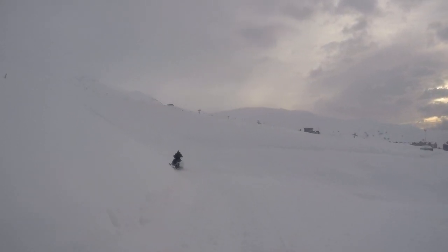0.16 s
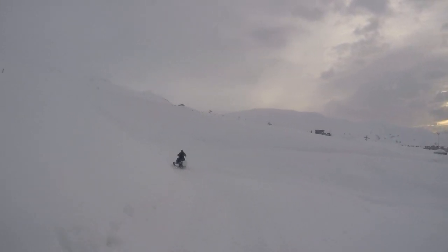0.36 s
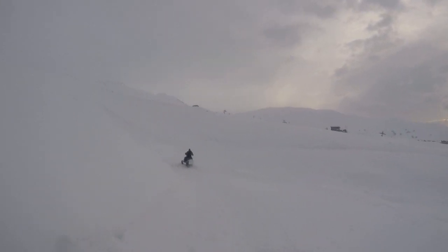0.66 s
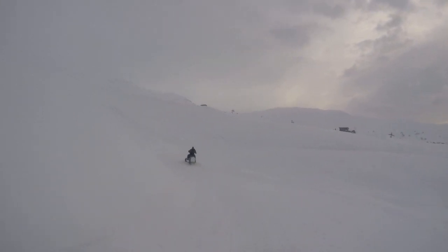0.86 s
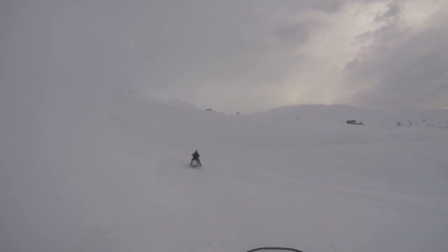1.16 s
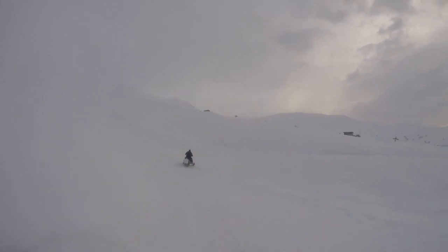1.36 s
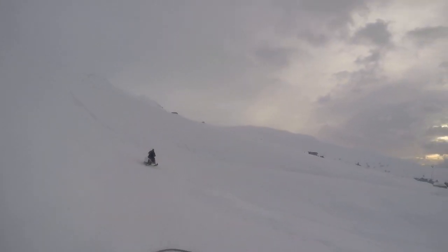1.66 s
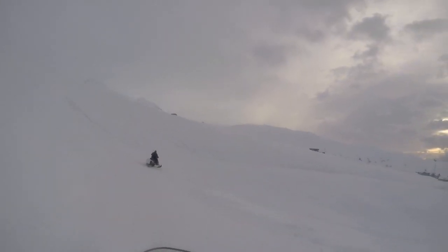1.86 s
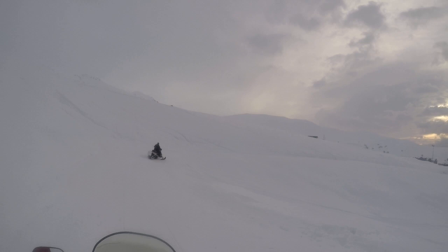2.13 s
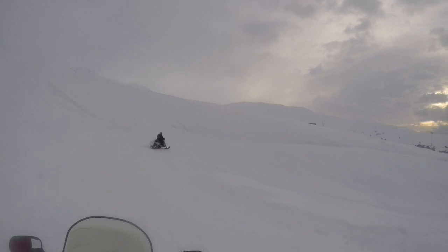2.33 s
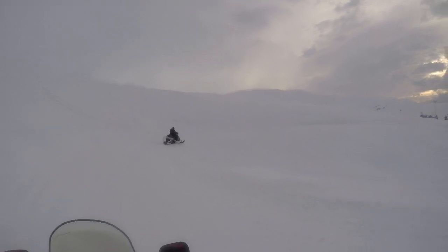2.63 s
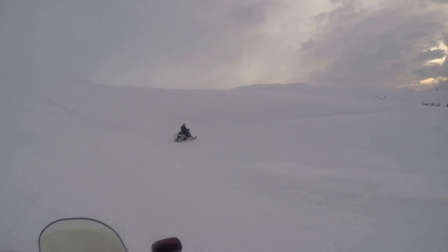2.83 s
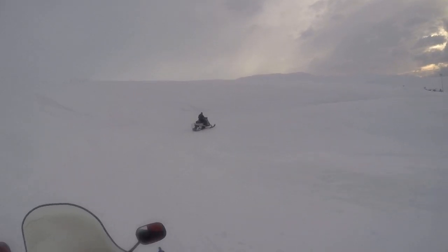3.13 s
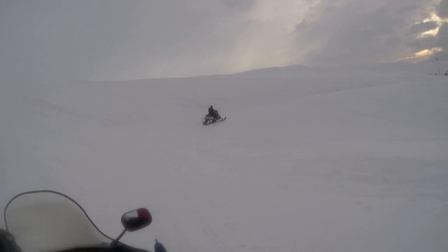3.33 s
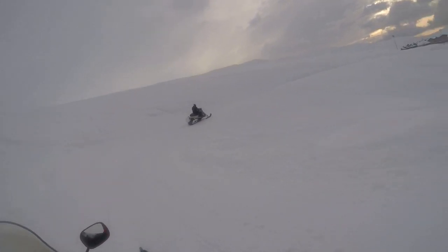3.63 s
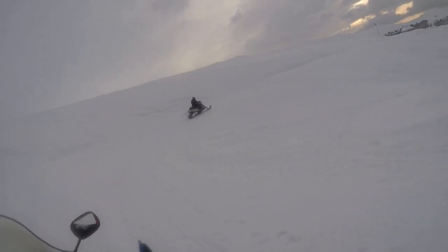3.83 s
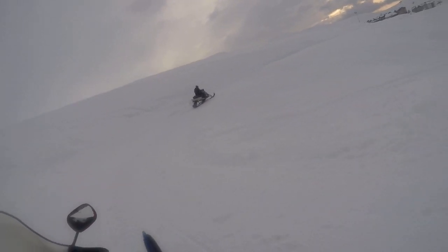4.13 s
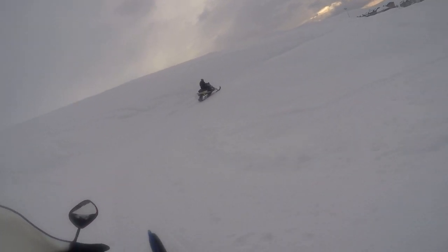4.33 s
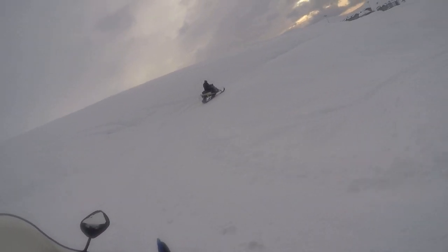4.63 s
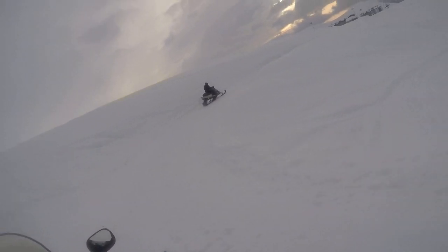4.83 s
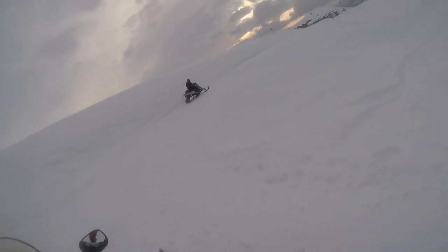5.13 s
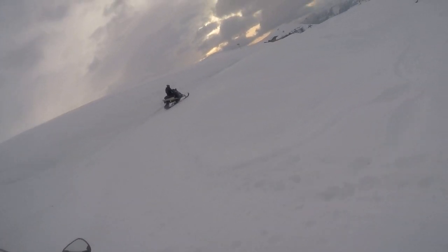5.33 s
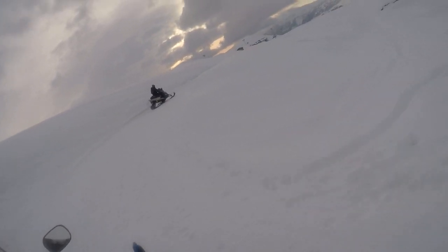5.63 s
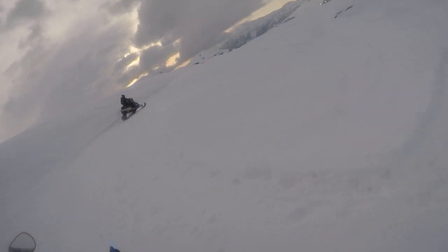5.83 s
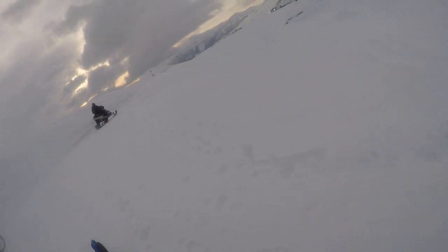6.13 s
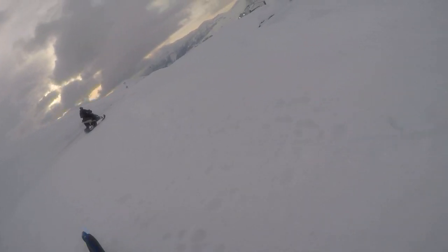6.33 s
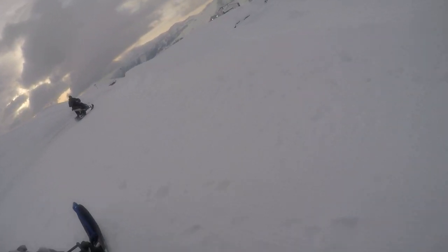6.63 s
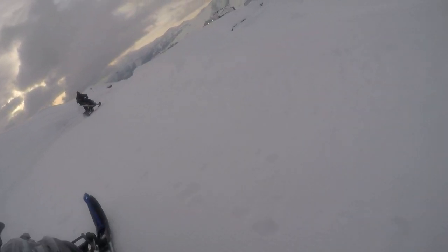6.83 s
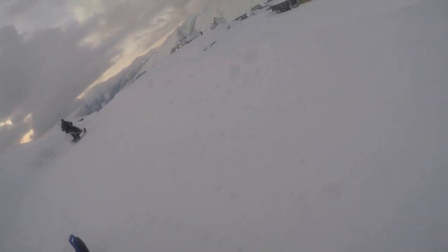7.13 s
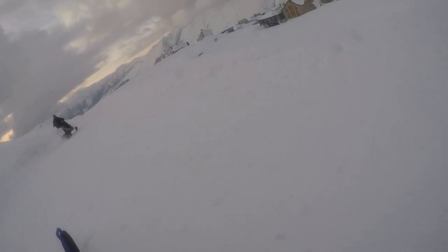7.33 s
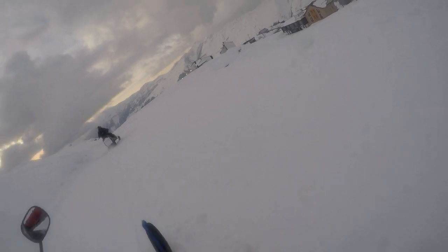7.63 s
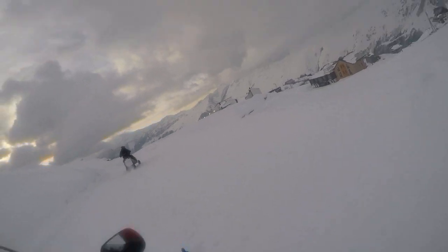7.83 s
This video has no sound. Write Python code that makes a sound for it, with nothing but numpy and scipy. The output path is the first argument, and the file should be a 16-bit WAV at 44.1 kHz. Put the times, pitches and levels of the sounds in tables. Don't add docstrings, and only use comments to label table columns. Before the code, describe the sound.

Outdoors on open snow, a close three-cylinder engine purrs and rattles while tiny grains tick the microphone housing. Revs swell and sink, then hold through a climb as low wind rumble grows. A long surge and a shorter one turn into harsh, singing roars, partly overloaded by gusts. Finally the revs drop into a coasting hum with one dull, heavy knock.

```python
import sys
import numpy as np
from scipy import signal
from scipy.fft import rfft, irfft, next_fast_len
from scipy.io import wavfile
from scipy.ndimage import uniform_filter1d

SR = 44100
rng = np.random.default_rng(int(sys.argv[2]) if len(sys.argv) > 2 else 0)


def linear_from_db(decibels):
    return 10 ** (np.asarray(decibels, float) / 20)


def dump_mix(stems):
    frames = np.atleast_2d(stems).T
    limited = np.clip(frames, -1, 1)
    pcm = np.round(limited * 32767).astype(np.int16)
    wavfile.write(sys.argv[1], SR, pcm)


N = 351914

# (frequency [Hz], width [Hz], level [dB])
INTAKE = [(880, 120, -3), (990, 120, 0), (1100, 120, -1), (1200, 110, -3)]


def evened(x):
    return x / np.sqrt(np.mean(x ** 2) + 1e-20)


def read(points, hz):
    f, value = np.transpose(points)
    return np.interp(np.log(hz + 1), np.log(f + 1), value)


def curves(rows):
    s, *columns = np.transpose(rows)
    return [np.interp(np.arange(N) / SR, s, c) for c in columns]


def white():
    return rng.standard_normal(N)


def noise(spectrum):
    size = next_fast_len(N)
    hz = np.fft.rfftfreq(size, 1 / SR)
    shaped = rfft(rng.standard_normal(size)) * linear_from_db(read(spectrum, hz))
    return evened(irfft(shaped, size)[:N])


def wander(per_s):
    knots = rng.standard_normal(int(N / SR * 60) + 2)
    return np.interp(np.arange(N) / SR * per_s, np.arange(len(knots)), knots)


def between(start, end, edge):
    t = np.arange(N) / SR
    return np.clip(np.minimum(t - start, end - t) / edge + .5, 0, 1)


def ring(x, modes):
    size = next_fast_len(N + 4096)
    delay = np.exp(-2j * np.pi * np.fft.rfftfreq(size))
    response = 0
    for k, (hz, width, db) in enumerate(modes):
        pole = np.exp((2j * hz - width) * np.pi / SR)
        response = response + (-1) ** k * linear_from_db(db) * ((1 - abs(pole)) / (1 - pole * delay)) ** 2
    return evened(irfft(rfft(x, size) * response, size)[:N])


def strokes(turns, pattern_db, depth, spread_db):
    firing = np.floor(len(pattern_db) * turns).astype(int)
    chance_db = spread_db * rng.standard_normal(firing[-1] + 1)[firing]
    size_db = depth * np.take(pattern_db, firing % len(pattern_db)) + chance_db
    return evened(linear_from_db(size_db) * (np.diff(firing, prepend=firing[0]) > 0))


def gate(turns, lag, length, depth):
    decay = np.exp(-((turns - lag) % 1) / length)
    return evened(1 + depth * uniform_filter1d(decay, size=90))


def loads(hz, throttle, lug):
    idle = np.clip((38 - hz) / (38 - 35), 0, 1) * (np.arange(N) < 2 * SR)
    pull = throttle ** 2
    part = 1 - pull
    return np.array([idle * part, (1 - idle) * (1 - lug) * part, lug * part, pull])


def order(k, turns):
    return np.sqrt(2) * np.cos(2 * np.pi * (k * turns + rng.random()))


def exhaust_orders(turns, hz, load):
    idle = [-17, -12, -8, -17, -12, -6, -13, -8, -14, -21, -11, -12, -17, -24, -25, -24, -23]
    cruise = [-12, -12, -9, -13, -18, -3, -12, -14, -3, -16, -16, -13, -12, -15, -9, -16, -18]
    lugging = [-15, -16, -12, -14, -20, -7, -20, -14, -7, -19, -16, -13, -8, -15, -12, -18, -18]
    pulling = [-9, -7, -5, -12, -15, -9, -13, -7, -12, -17, -13, -14, -13, -15, -14, -17, -16]
    # (frequency [Hz], level [dB])
    pipe = [(150, -2), (205, 0), (255, -6), (315, 1), (350, -1), (382, 1), (425, 0), (460, -5), (495, 2),
            (530, -8), (580, 1), (640, -7), (720, -11), (820, -8), (1000, -16)]
    hot_pipe = [(440, 0), (500, -7), (545, 0), (580, 5), (640, 0)]
    tone = np.zeros(N)
    for k, by_load_db in enumerate(np.transpose([idle, cruise, lugging, pulling]), 4):
        pipe_db = read(pipe, k * hz) + load[3] * read(hot_pipe, k * hz)
        level_db = by_load_db @ load + pipe_db + 1.5 * wander(3)
        tone += linear_from_db(level_db - 1.5) * order(k, turns)
    return tone


def exhaust_turbulence():
    # (frequency [Hz], level [dB per Hz])
    puff = [(100, -48), (145, 9), (189, 5.5), (241, -2), (306, -1), (450, -2.5), (625, -8), (800, -12.5),
            (1040, -31), (1760, -120)]
    return linear_from_db(2.5) * noise(puff)


def intake_pulses(turns, throttle):
    cylinders_db = [0, -5, -13]
    return linear_from_db(-10) * ring(strokes(turns, cylinders_db, 1 + .2 * throttle, .8), INTAKE)


def intake_roar(throttle):
    return (1 - .6 * throttle) * ring(white(), INTAKE)


def panel_knocks(turns):
    # (frequency [Hz], width [Hz], level [dB])
    panel = [(1690, 130, 0), (1785, 130, -1), (1895, 120, -7)]
    return ring(strokes(turns - .03, [0, -21, -23], 1, .6), panel)


def cowling_buzz():
    # (frequency [Hz], width [Hz], level [dB])
    cowling = [(1750, 290, 0), (2080, 220, -10), (1540, 200, -13)]
    return ring(white(), cowling)


def valve_cover(load):
    # (frequency [Hz], width [Hz])
    gear = [(2900, 330), (3840, 110), (4350, 750), (4450, 160), (5900, 350), (6480, 320), (6950, 500),
            (7750, 320), (8850, 280), (9500, 420), (10500, 300)]
    gear_loads = [
        [3, -12, -7.5, -13, -11, -15, -10, -6, -5, -8, -24],
        [-1, -11, -16, -13, -17, -8, -9, -3, -7.5, -10.5, -40],
        [-0.083, -10, -20, -2.5, -12, -6, -7, -3.5, -4.5, -10, -25],
        [-2, -3, -25, -1, -9, -9, -7, -3, -8.5, -5, -25],
    ]
    hz, t, z = signal.stft(white(), SR, nperseg=512)
    share = load[:, np.minimum(np.round(t * SR).astype(int), N - 1)]
    shape = np.array([1 / (1 + (2 * (hz - f) / width) ** 2) for f, width in gear])
    response = shape.T @ linear_from_db(np.transpose(gear_loads) @ share)
    return evened(signal.istft(z * response, SR, nperseg=512)[1][:N])


def injector_ticks(turns, hz, throttle):
    puff = white() * gate(turns, .267, .1, 40)
    tick = linear_from_db(-1.5 + 1.6 * wander(2.4)) * ring(puff, [(9690, 540, 0)])
    tick += linear_from_db(-4 + 2 * wander(4.1)) * ring(puff, [(8900, 600, 0)])
    return linear_from_db(-2.5 - 20 * np.sqrt(throttle) - 1.26 * (hz - 32)) * tick


def shroud_rattle(turns, hz, throttle):
    # (frequency [Hz], width [Hz], level [dB])
    shroud = [(3840, 120, 0), (4480, 260, 0), (5700, 500, -3), (6800, 900, -1), (7750, 400, 1)]
    level = linear_from_db(-6 + .5 * (hz - 47.5)) * throttle ** 2
    return level * gate(turns, .75, .33, 6) * ring(white(), shroud)


def valve_gear(turns, hz, throttle, load):
    # (frequency [Hz], level [dB per Hz])
    hiss = [(1350, -31), (2250, 2), (2600, 0), (2930, 0), (3520, -4.5), (4080, -4.5), (4600, -4),
            (5340, -7.5), (6760, -11), (7730, -16.5), (8320, -10), (9720, -11), (11500, -36.5),
            (15000, -66), (22000, -120)]
    throb = 1 + (.25 + .5 * throttle) * (gate(turns, .02, .3, 2.5) - 1)
    rush = noise(hiss) + linear_from_db(-3) * valve_cover(load)
    return throb * rush + shroud_rattle(turns, hz, throttle) + injector_ticks(turns, hz, throttle)


def track_rumble():
    # (frequency [Hz], level [dB per Hz])
    valley = [(500, -20), (700, 1.5), (1000, 7), (1400, 2), (2000, 3.5), (2600, -17), (3200, -36)]
    return np.array([noise(valley), noise(valley)])


def hood_and_airbox(turns, hz, load, opening, near_db):
    hood_idle = [-90, -90, -90, -90, -65, -70, -70, -62, -63, -67, -68, -65, -60, -64]
    hood_cruise = [-73, -67, -76, -78, -73, -69, -66, -58, -67, -63, -57, -64, -71, -73]
    hood_lugging = [-90, -90, -90, -90, -66, -61, -63, -68, -60, -66, -62, -67, -69, -70]
    # (frequency [Hz], level [dB])
    airbox = [(700, -34), (800, -26), (880, -17), (925, -4), (960, 0), (992, 0), (1020, -10), (1050, -17),
              (1110, -19), (1165, -9), (1220, -8), (1265, -14), (1330, -20), (1500, -21)]
    tone = np.zeros(N)
    part = load[:3] / (load[:3].sum(0) + 1e-9)
    boxed = np.clip((opening - .75) / .2, 0, 1)
    for k, by_load_db in enumerate(np.transpose([hood_idle, hood_cruise, hood_lugging]), 17):
        hood = (1 - boxed) * linear_from_db(by_load_db @ part + 20 * opening)
        box = boxed * linear_from_db(-37.5 + near_db + read(airbox, k * hz))
        tone += (hood + box) * linear_from_db(1.5 * wander(4)) * order(k, turns)
    return tone


def frame_hum(turns, lug):
    firing = linear_from_db(-30) * lug * np.cos(6 * np.pi * turns)
    drive = linear_from_db(-46) * (between(7.35, 9, .2) + .4 * lug) * np.cos(2 * np.pi * 21 * turns)
    return firing + drive


def engine():
    # (time [s], cycle rate [Hz])
    speed = [(.33, 31.8), (.84, 34.5), (1.16, 35.3), (1.53, 40), (1.76, 41.6), (2.22, 42.1), (2.36, 41.7),
             (2.69, 37.9), (3, 36.9), (3.15, 37.2), (3.4, 39), (3.65, 39.4), (4.04, 39.65), (4.51, 39.5),
             (4.76, 38.7), (5.38, 38.75), (5.82, 46.5), (6.25, 52.7), (6.31, 51.6), (6.6, 42.6),
             (6.68, 41.6), (6.8, 41.8), (7.16, 46.2), (7.38, 41.8), (7.69, 39.7), (7.98, 39.4)]
    # (time [s], throttle opening [0-1])
    rider = [(0, .14), (.7, .2), (1.2, .3), (1.4, .72), (1.85, .66), (2.4, .2), (3.15, .18), (3.32, .42),
             (5.36, .4), (5.48, 1), (6.3, 1), (6.36, .03), (6.62, .03), (6.7, .86), (6.87, .98), (7.16, 1),
             (7.22, .03), (7.98, 0)]
    # (time [s], gain [dB])
    lean = [(0, -2.5), (1.2, -0.5), (2, 1), (3.2, 1), (3.9, 5), (4.6, 5), (4.8, 2.5), (5.35, 3.5),
            (5.7, 6.5), (6.2, 11), (6.4, 8), (6.6, 8), (6.8, 7), (7.15, 7.5), (7.5, 8.5), (7.98, 5)]
    hz = uniform_filter1d(curves(speed)[0], size=2000)
    turns = np.cumsum(hz) / SR
    opening, lean_db = curves(rider)[0], curves(lean)[0]
    lug = between(3.35, 5.65, .2)
    throttle = opening ** 2
    fuel = np.minimum(opening / .22, 1)
    load = loads(hz, throttle, lug)

    step = 1 / (.2 * SR)
    sag_db = -9 * np.maximum(opening - signal.lfilter([step], [1, step - 1], opening), 0)

    exhaust_db = -38.5 - 3 * between(2.35, 3.2, .2) + 7.5 * fuel
    exhaust_db += (.042 * lean_db + .5 * opening) * (1 - throttle)
    intake_db = -49.5 + 22 * opening + sag_db
    mouth = linear_from_db(intake_db - 2 - 2 * lug - 6 * throttle ** 2)
    cowling_db = -44 + .5 * sag_db + 7.5 * np.sqrt(opening) + .81 * lean_db + between(3.75, 4.7, .45)
    hiss_db = -49 + 2.5 * opening + lean_db

    even = .33 + (.95 - .33) * np.minimum(2 * fuel, 1) - .025 * np.maximum(lean_db - 7, 0)
    tuned = (2 * lug + between(3.75, 4.7, .2)) / 3
    knock = .35 + .35 * opening + .54 * tuned * (1 - throttle)
    uneven, buzz = np.sqrt(1 - even ** 2), np.sqrt(1 - knock ** 2)

    steady = linear_from_db(exhaust_db) * even * exhaust_orders(turns, hz, load)
    steady += mouth * even * intake_pulses(turns, throttle)
    steady += linear_from_db(cowling_db) * knock * panel_knocks(turns)
    rough = []
    for _ in range(2):
        draw = linear_from_db(exhaust_db) * uneven * exhaust_turbulence()
        draw += mouth * uneven * intake_roar(throttle)
        draw += linear_from_db(cowling_db) * buzz * cowling_buzz()
        draw += linear_from_db(hiss_db) * valve_gear(turns, hz, throttle, load)
        rough.append(draw)
    frame = linear_from_db(hiss_db + 5 - 3 * throttle - 2.5 * (1 - fuel)) * track_rumble()
    frame += hood_and_airbox(turns, hz, load, opening, .31 * lean_db + sag_db)
    frame += frame_hum(turns, lug)
    return steady, np.array(rough), frame


def steadied(x, share):
    level = np.sqrt(abs(uniform_filter1d(x ** 2, size=3000)) + 1e-3)
    return evened(x / level ** share)


def gusty(lull_db, gusts):
    t = np.arange(0, N, 64) / SR
    power = linear_from_db(2 * lull_db[::64])
    for s, db, length in gusts:
        power = np.maximum(power, linear_from_db(2 * db - 48 * ((t - s) / length) ** 2))
    return np.sqrt(np.repeat(power, 64)[:N])


def wind():
    # (time [s], level [dB])
    strength = [(0, -43), (.6, -52), (1.3, -54), (1.64, -41), (1.7, -32.5), (2.5, -28.5), (3.5, -28),
                (4.1, -25.5), (4.9, -26), (5.2, -24.5), (5.6, -26), (5.8, -23), (6.3, -18.5), (7.15, -15.5),
                (7.27, -19.5), (7.4, -18), (7.98, -19)]
    # (frequency [Hz], level [dB per Hz])
    boom = [(8.8, -41), (15, -8), (43, 22), (54, 12), (70, 11), (80, -9), (100, -49), (180, -120)]
    drone = [(44, -17), (75, -13), (97, 8), (113, 10), (127, 0), (167, -24), (260, -24), (340, -32),
             (570, -120)]
    # (time [s], peak level [dB], length [s])
    boom_gusts = [(1.708, -30, 0.071), (1.83, -29, 0.06), (1.93, -25.5, 0.14), (2.01, -26.5, 0.13),
                  (2.71, -23, 0.086), (3.243, -23, 0.085), (3.333, -23, 0.09), (3.644, -23, 0.068),
                  (4.05, -17, 0.083), (4.199, -15.5, 0.054), (4.6, -31, 0.07), (4.693, -30, 0.06),
                  (4.765, -20, 0.064), (5.274, -19.5, 0.1), (5.752, -15, 0.16), (5.948, -9, 0.055),
                  (6.103, -7.5, 0.039), (6.173, -10, 0.025), (6.24, -9.5, 0.087), (6.796, -9, 0.047),
                  (6.92, -10, 0.055), (6.99, -10, 0.12), (7.127, -19, 0.11), (7.717, -9, 0.051)]
    drone_gusts = [(1.677, -36, 0.08), (2.012, -25, 0.045), (2.607, -24, 0.11), (2.695, -18.5, 0.086),
                   (2.977, -20, 0.076), (3.075, -22.5, 0.15), (3.405, -17, 0.078), (3.898, -21.5, 0.23),
                   (4.134, -21, 0.072), (4.19, -20, 0.055), (4.38, -16.5, 0.052), (4.652, -16.5, 0.084),
                   (4.955, -23, 0.083), (5.323, -24, 0.07), (5.382, -31, 0.07), (5.818, -20.5, 0.12),
                   (5.925, -18, 0.16), (6.026, -10.5, 0.054), (6.344, -13, 0.14), (6.541, -12.5, 0.15),
                   (7.006, -15, 0.09), (7.101, -14, 0.056), (7.348, -11, 0.048), (7.657, -13.5, 0.052)]
    wind_db = curves(strength)[0] + 2 * wander(8)
    drone_db = wind_db - 3 + 2 * wander(12)
    low = gusty(wind_db, boom_gusts) * steadied(noise(boom), .99)
    return low + gusty(drone_db, drone_gusts) * steadied(noise(drone), 1)


def knocks():
    # (time [s], peak level [dB], frequency [Hz])
    grains = [
        (.471, -40, 7500),
        (.513, -29, 8600),
        (.528, -39, 8000),
        (1.752, -37, 8500),
        (2.33, -36, 12000),
        (2.876, -30, 12400),
        (3.13, -38, 9000),
        (3.345, -35, 7975),
    ]
    # (time [s], peak level [dB], ring [Hz], t60 [s])
    bumps = [
        (1.679, -16, 250, .05),
        (1.682, -19, 330, .04),
        (1.686, -18, 150, .06),
        (7.838, -9, 165, .07),
        (7.852, -7, 490, .025),
        (7.842, -9, 250, .06),
        (7.848, -9, 360, .035),
        (7.853, -11, 620, .022),
        (7.854, -13, 780, .02),
        (7.853, -5, 72, .12),
    ]
    out, t = np.zeros(N + SR), np.arange(6000) / SR
    for s, db, hz in grains:
        out[round(s * SR):][:len(t)] += linear_from_db(db - 60 * t / .0013) * np.sin(2 * np.pi * hz * t)
    for s, db, hz, t60 in bumps:
        onset = 1 - np.exp(-t / .0026)
        out[round(s * SR):][:len(t)] += linear_from_db(db - 60 * t / t60) * onset * np.sin(2 * np.pi * hz * t)
    return out[:N]


def ports(steady, rough):
    # (frequency [Hz], left minus right [dB], likeness [0-1], right leads by [rad])
    port_table = [(50, 1.7, .99, .1), (200, 2, .92, .1), (430, 4.5, .82, .3), (600, 8.5, .7, .3),
                  (670, 9, .3, -1.5), (750, 2, .9, -3.1), (1200, 1, .9, -3.0), (1340, 2, .5, -2.6),
                  (1750, -1.5, .98, -1.75), (2400, -3, .6, -1.2), (3500, 3, .75, -1.2),
                  (4600, -10, .65, -1.3), (5400, -10, .5, -3.1), (7750, -12, .45, 0), (10500, -5, .4, -.5)]
    size = next_fast_len(N + 2048)
    hz = np.fft.rfftfreq(size, 1 / SR)
    f, *columns = np.transpose(port_table)
    balance_db, like, lead = (np.interp(np.log(hz + 1), np.log(f), c) for c in columns)
    clean, (shared, own) = rfft(steady, size), rfft(rough, size)
    left = linear_from_db(balance_db) * (clean + shared)
    right = np.exp(1j * lead) * (clean + like * shared) + np.sqrt(1 - like ** 2) * own
    both = .5 * np.sqrt(linear_from_db(2 * balance_db) + 1 + 2 * like * linear_from_db(balance_db) * np.cos(lead))
    return irfft(np.array([left, right]) / both, size)[:, :N]


def scene():
    # (time [s], left minus right [dB])
    head = [(0, -1.5), (1.4, -1.5), (2.2, -.6), (4, -.2), (7.98, .3)]
    steady, rough, frame = engine()
    heard = ports(steady, rough + np.array([wind(), wind()])) + frame
    heard = heard + linear_from_db([[1], [-1]]) * knocks()
    return heard * linear_from_db(np.array([[.5], [-.5]]) * curves(head)[0])


def low_pass(x):
    return signal.sosfilt(signal.butter(12, 15040, fs=SR, output="sos"), x)


def record(dry):
    # (frequency [Hz], level [dB per Hz])
    preamp = [(3000, -38), (10000, 3.5), (11500, -5), (14000, -3), (15000, -22)]
    noisy = dry + linear_from_db(-62.5) * np.array([noise(preamp), noise(preamp)])
    return low_pass(1.315 * np.tanh(noisy / 1.47))


dry = scene()
out = record(dry)
dump_mix(out)
```